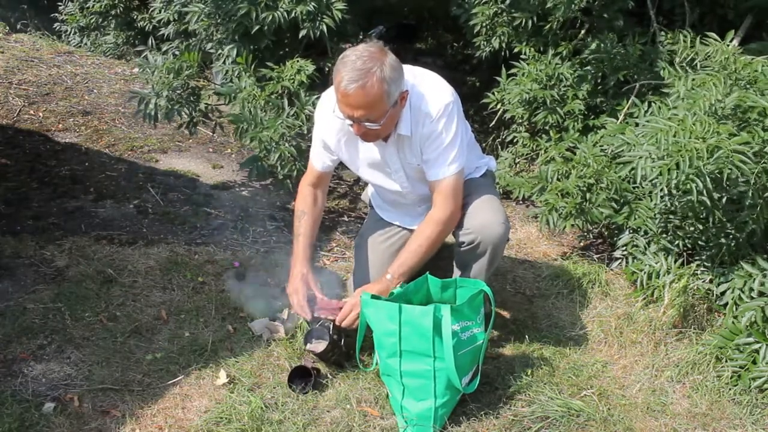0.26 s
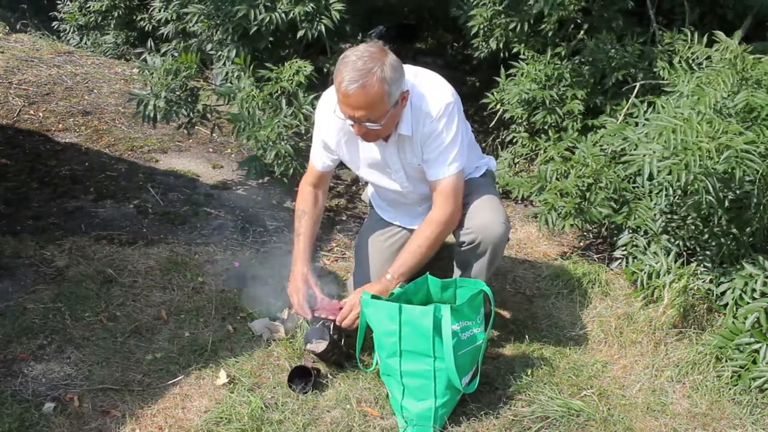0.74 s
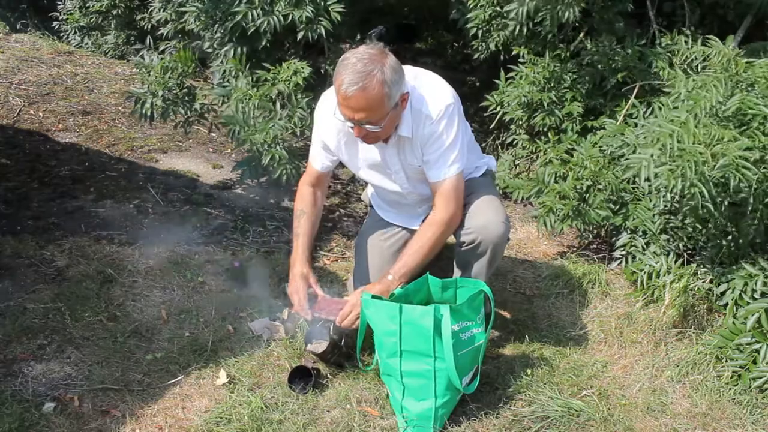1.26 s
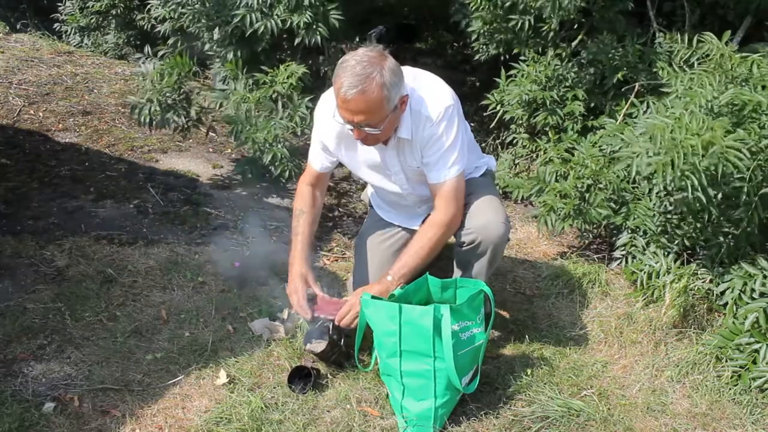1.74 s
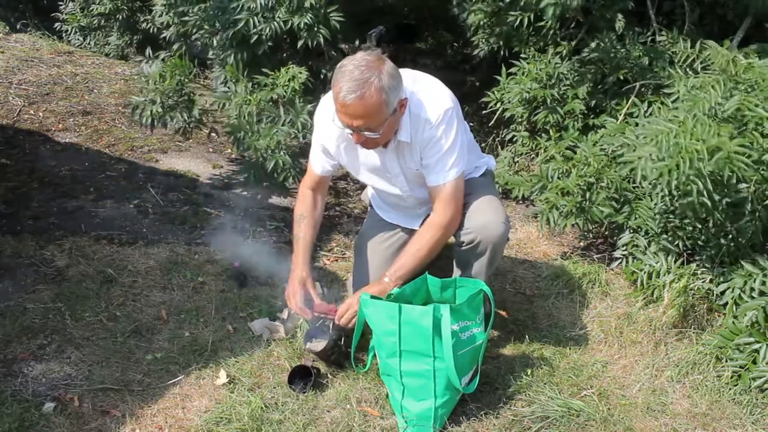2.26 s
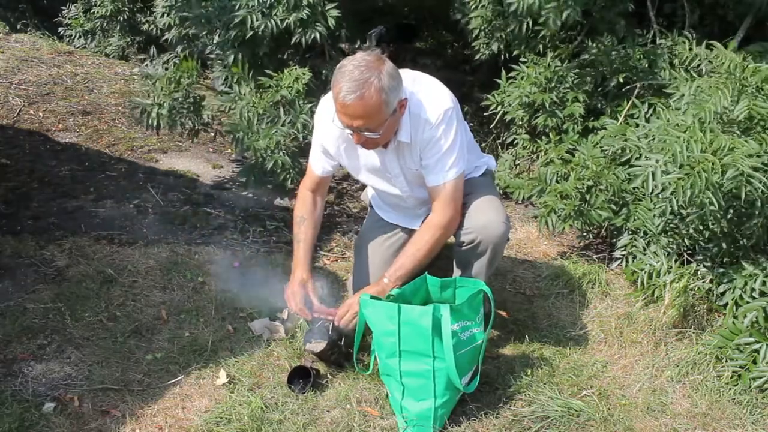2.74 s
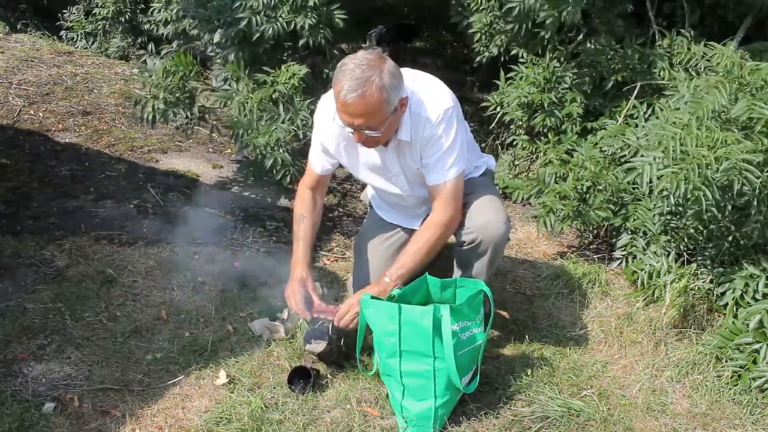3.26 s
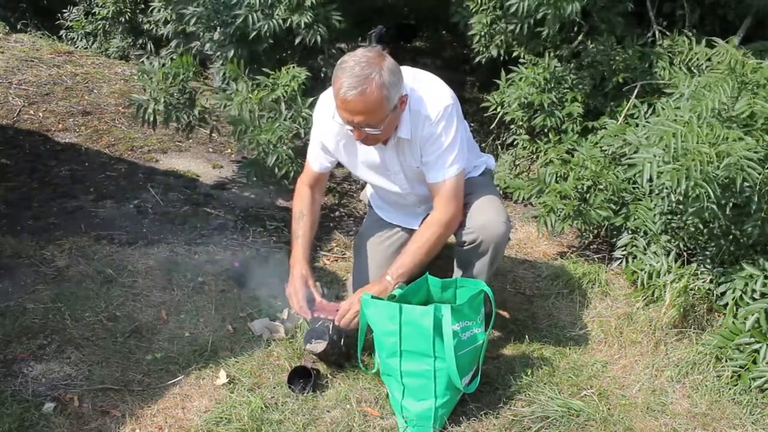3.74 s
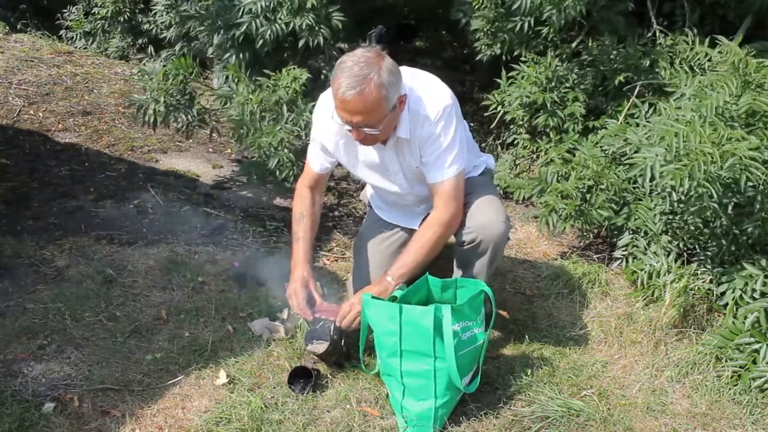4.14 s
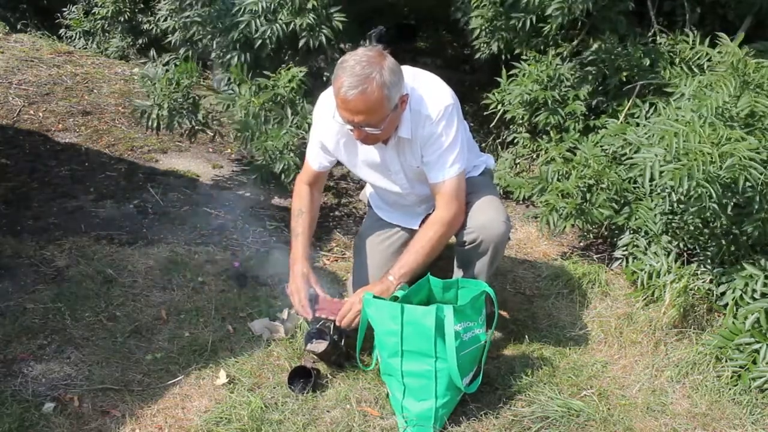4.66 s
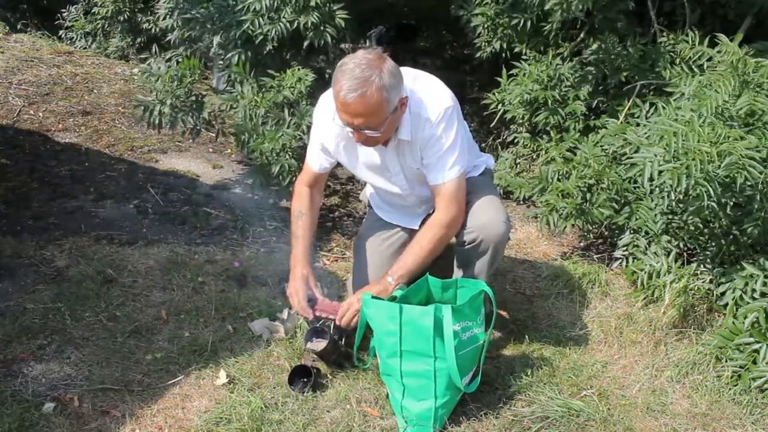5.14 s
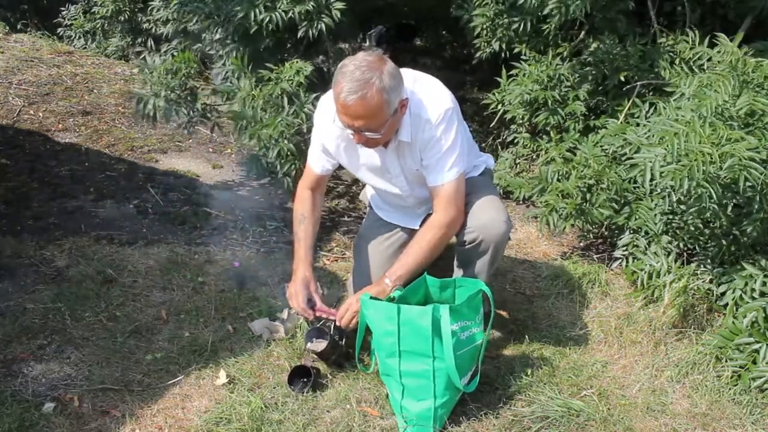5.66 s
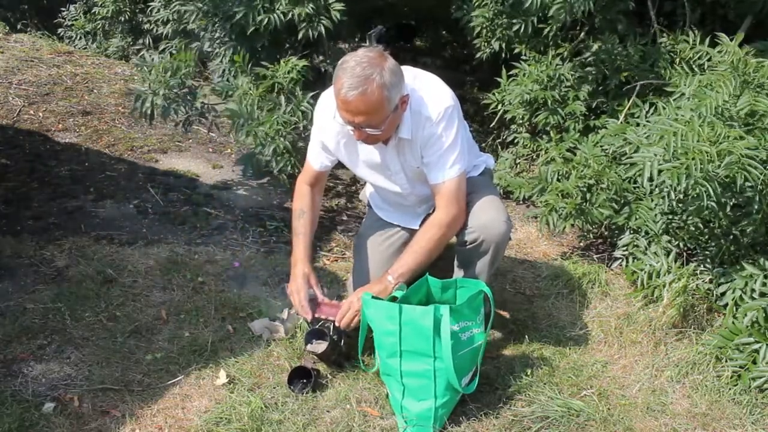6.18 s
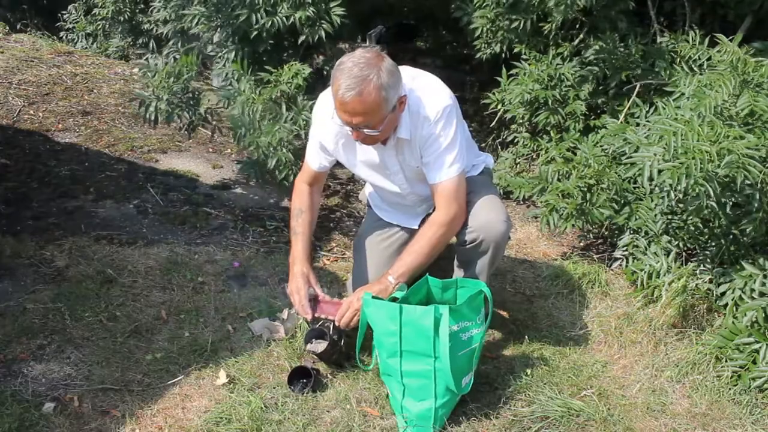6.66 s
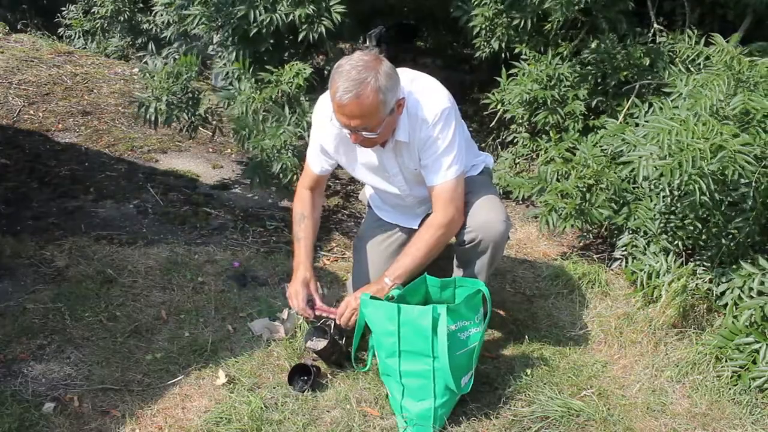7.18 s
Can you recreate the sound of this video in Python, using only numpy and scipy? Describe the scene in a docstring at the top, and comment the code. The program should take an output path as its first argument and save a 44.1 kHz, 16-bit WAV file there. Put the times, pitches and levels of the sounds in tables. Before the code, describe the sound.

Rapid, regular squeezes of a smoker's bellows: hoarse airy whooshes, dry clacks and faint creaks, speeding up slightly amid wind rumble and leaf hiss.

```python
"""A bee smoker is pumped on a lawn, quickening from about two to over two and a half squeezes a second.
Each squeeze is shaped noise: air through smouldering fuel, tin can and nozzle, plus a whistle when brisk.
The bellows suck air back in (noise) and often snap open with a clack; clacks, thuds, creaks and
valve chatter are pushes on decaying modes. Faint echoes follow. Wind rumbles on a single microphone
over a steady hiss of foliage, with thin far notes as of a bird."""
import sys
import numpy as np
from scipy import signal
from scipy.fft import rfft, irfft
from scipy.io import wavfile

SR = 44100
rng = np.random.default_rng(int(sys.argv[2]) if len(sys.argv) > 2 else 0)


def waveform_to_disk(signal):
    """Save audio, clipped to [-1, 1], as 16-bit WAV at the path in sys.argv[1]."""
    frames = np.transpose(np.atleast_2d(signal))
    scaled = np.clip(frames, -1, 1) * 32767
    samples = np.round(scaled).astype(np.int16)
    wavfile.write(sys.argv[1], SR, samples)


N = 327222
TIME_S = np.arange(N) / SR

# All table levels are relative; each source adds its own level.
# squeezes: (start [s], length [s], effort [dB])
SQUEEZES = [(-.026, 0.2, -1.5), (0.461, .2, -1.5), (0.928, .18, -1), (1.378, .19, -2.5), (1.821, 0.18, .5),
            (2.258, .17, 1), (2.677, .17, -1.5), (3.109, 0.17, -0.5), (3.537, .18, 0.5), (3.956, 0.17, .5),
            (4.376, .16, 1), (4.794, .15, 2), (5.18, .16, 0), (5.581, .16, 0), (5.979, .15, 0),
            (6.359, 0.16, 1.5), (6.755, .16, 0), (7.127, .15, 0.5)]
# fuel roar colour: (frequency [Hz], density [dB])
ROAR_COLOUR = [(40, -9), (130, 3.5), (280, 1), (450, 1), (800, -2.5), (1300, -2), (1700, -5.5),
               (2200, -5.5), (3000, -35), (6000, -36)]
# nozzle rush colour: (frequency [Hz], density [dB])
RUSH_COLOUR = [(1200, -16), (2100, -4), (2500, 1.5), (2800, 2.5), (3600, -2.5), (4050, -2), (4300, -8.5),
               (6000, -13.5), (15000, -26)]
# jet hiss colour: (frequency [Hz], density [dB])
HISS_COLOUR = [(2000, -15), (4000, 1), (6000, -1), (7500, 1.5), (9800, 3), (10500, 0), (12000, 0),
               (13400, -5.5), (14300, -7), (15700, -12)]
# can and nozzle resonances: (centre [Hz], width [Hz], lift [dB])
CAN_RESONANCES = [(302, 270, -0.5), (467, 31, 5), (577, 62, 7.5), (725, 98, -9), (1197, 160, 3.5),
                  (1440, 186, 4.5), (2977, 190, 6.5), (3235, 150, 6.5), (3490, 170, 7.5), (3767, 140, 7.5)]
# nozzle whistle partials: (pitch [Hz], waver [Hz], level [dB])
WHISTLE_TONES = [(2520, 46.6, 7), (5066, 67, 2)]
# intake colour: (frequency [Hz], density [dB])
INTAKE_COLOUR = [(200, -17), (700, -9), (1500, 6.5), (2400, 2.5), (3200, 7.5), (4200, 0.5), (5500, 0.5),
                 (7000, -1), (8800, -1), (11800, -1.5), (13200, -7), (14300, -7), (15700, -16)]
# intake port resonances: (centre [Hz], width [Hz], lift [dB])
PORT_RESONANCES = [(1650, 500, -11.5), (3170, 270, -1.5), (3620, 410, -9.5), (6700, 400, -4),
                   (8610, 360, 5.5), (9600, 420, 4.5), (11750, 460, 2.5), (13700, 500, -4), (14350, 550, 4)]
# bellows snapping open: (time [s], strength [dB], extra crack [dB])
SNAPS = [(0.4022, -2, 2.5), (0.8806, -1, -7), (1.3355, -0.5, -7), (1.7836, -4, -6), (2.2023, 2, 2.5),
         (2.6218, 0, 4.5), (3.0106, 2.5, -2), (3.4621, -1, 2), (3.891, 3, 3), (5.1196, 1, 8),
         (5.489, 0, -12), (5.8875, -0.5, -8), (6.266, 0.5, -2.5), (6.6608, -1, -1), (7.0474, -.5, 2),
         (7.4165, -1.5, -12)]
# centres of thump, knock and crack: (frequency [Hz])
CLACK_PART_HZ = [407, 870, 2800]
# modes of the bellows and the can they carry: (frequency [Hz], level [dB], t60 [s])
BELLOWS_MODES = [(172, -17, 0.02), (342, -15, 0.018), (643, -15.5, 0.016), (830, -13, 0.013),
                 (1064, -13.5, 0.0066), (1490, -20.5, 0.015), (1940, -9, 0.0041), (2530, -19.5, 0.0052),
                 (2800, -8, 0.005), (3280, -6.5, 0.0063)]
# heavier buckling of the wall: (time [s], level [dB])
BUCKLES = [(.541, -5), (1.009, -8.5), (1.467, -6), (2.318, -4.5), (3.618, -7), (4.601, -20)]
# further single creaks, faint to loud: (time [s], level [dB], brightness [dB/octave])
CREAKS = [(.9585, -16.5, -12), (2.224, -10.5, -5.5), (2.608, -14, -1), (2.715, -8.5, 2), (3.86, -14.5, 5),
          (3.9705, -19, 2), (4.602, -24, -4), (4.712, -21.5, -4), (5.102, -14.5, 5), (5.587, -16, 0),
          (5.611, -9, -2), (6.334, -20, 3), (7.125, -13.5, 8)]
# ring of a slipping crease: (frequency [Hz], level [dB], t60 [s])
CREASE_RING = [(580, -6.5, 0.013), (920, -1, 0.0079), (1200, -8, 0.013), (1680, -5.5, 0.0082),
               (3030, -8, 0.0036)]
# ring of the valve flap: (frequency [Hz], level [dB], t60 [s])
FLAP_RING = [(250, -5.5, 0.012), (1260, -26, 0.0063), (2500, -2, 0.007), (2940, -5.5, 0.0047),
             (3770, -21, 0.0042)]
# echoes from the ground and the bushes: (delay [s], level [dB])
ECHO_PATHS = [(.0098, -36), (0.011, -24.5), (0.016, -28.5), (.0222, -30), (.0415, -47)]
# wind rumble colour: (frequency [Hz], density [dB])
WIND_COLOUR = [(5, -52), (15, 1), (28, -2.5), (42, -0.5), (65, 3), (100, -2.5), (150, -7), (220, -21.5),
               (350, -30), (600, -40.5), (2000, -63)]
# wind strength: (time [s], level [dB])
GUST_LEVELS = [(0.0, -28), (0.2, -28), (0.35, -19.5), (0.85, -19), (1.0, -31.5), (1.35, -22), (2.0, -22.5),
               (2.7, -30), (2.82, -17.5), (3.05, -24), (3.2, -28.5), (3.65, -26), (4.5, -36.5),
               (4.8, -26.5), (5.05, -29), (5.3, -36.5), (6.2, -28), (7.42, -28.5)]
# sudden buffets on the microphone: (time [s], level [dB])
SUDDEN_BUFFETS = [(.26, -14.5), (1.469, -12.5)]
# foliage colour: (frequency [Hz], density [dB])
FOLIAGE_COLOUR = [(200, 10), (450, 2), (800, -3), (1600, -5.5), (2300, -7), (3200, 1.5), (4000, -3.5),
                  (5000, -9.5), (7000, -13), (10000, -16.5), (15700, -23)]
# far gliding notes: (start [s], length [s], first pitch [Hz], last pitch [Hz], level [dB])
BIRD_NOTES = [(.16, .12, 4130, 3850, -40), (.46, .08, 4400, 4330, -42), (.66, .09, 4270, 4330, -43),
              (3.04, .1, 4240, 4130, -45), (4.25, .1, 4460, 4300, -42), (4.74, .08, 4420, 4300, -45)]

LAST_CYCLE_S = 0.38  # last squeeze and its refill
# woody part of the clack, in easy and in brisk pumping
KNOCK_DB, BRISK_KNOCK_DB, BRISK_FROM_S = -10, -1, 5.3
# the wall folds early in each squeeze but the first, with a creak and a soft thud
FOLD_AFTER_S, FOLD_CREAK_DB, FOLD_THUD_DB = .032, -14, -16
# it stirs again just before each clack
UNFOLD_BEFORE_S, UNFOLD_THUD_DB = .048, -25
CUTOFF_HZ = 15600


def from_db(db):
    """Decibels to amplitude gain."""
    return 10 ** (np.asarray(db) / 20)


def rms_one(x):
    """Scale to rms 1."""
    return x / np.sqrt(np.mean(x ** 2) + 1e-20)


def drift(rate_hz):
    """Smooth random wander of rms 1: noise through a two-pole low-pass."""
    pole = np.exp(-2 * np.pi * rate_hz / SR)
    white = rng.standard_normal(N + SR)
    settled = signal.lfilter([1], [1, -2 * pole, pole * pole], white)[SR:]
    return rms_one(settled)


def noise(colour, resonances=()):
    """Noise of rms 1 with a broad colour, lifted or cut at resonances."""
    hz = np.arange(N // 2 + 1) * SR / N + 1e-3
    points_hz, levels_db = np.transpose(colour)
    db = np.interp(np.log(hz), np.log(points_hz), levels_db)
    for centre_hz, width_hz, lift_db in resonances:
        db = db + lift_db / (1 + (2 * (hz - centre_hz) / width_hz) ** 4)
    return rms_one(irfft(rfft(rng.standard_normal(N)) * from_db(db), N))


def ring(push, hz, t60_s):
    """A pushed mode swings and decays by 60 dB in t60; a unit impulse peaks near 1."""
    pole = from_db(-60 / (t60_s * SR))
    step = 2 * np.pi * hz / SR
    return signal.lfilter([.5, 0, -.5], [1, -2 * pole * np.cos(step), pole * pole], push + 1e-18)


def pushes(times_s, sizes, width_s):
    """Short bell-shaped pushes, each of the given area."""
    out = np.zeros(N)
    out[np.clip(np.round(times_s * SR).astype(int), 0, N - 1)] = sizes
    bell = signal.windows.gaussian(441, width_s * SR)
    return np.convolve(out, bell / bell.sum(), "same")


def strokes(starts_s, lengths_s, levels_db, attack, release, rise_power, fall_power,
            surge_db=0, surge_span=0.086):
    """Gain of repeated strokes: swell, surge, fade; attack, release and span are shares of a stroke."""
    out = np.zeros(N)
    for start, length, db in zip(starts_s, lengths_s, levels_db):
        on = (TIME_S > start) & (TIME_S < start + length)
        share = (TIME_S[on] - start) / length
        surge = surge_db * np.exp(-.5 * ((share - attack) / surge_span) ** 2)
        rise = np.minimum(share / attack, 1) ** rise_power
        fall = np.minimum((1 - share) / release, 1) ** fall_power
        out[on] += from_db(db + surge) * rise * fall
    return out


def cycles_s():
    """Time from each squeeze to the next."""
    return np.append(np.diff(np.array(SQUEEZES)[:, 0]), LAST_CYCLE_S)


def puffs(roar_db=-25.0, rush_db=-27.0, hiss_db=-30.0, flutter_db=2.0, flutter_hz=90):
    """Air roars through the fuel and rushes in the nozzle, both fluttering; the jet hiss swells latest."""
    start, length, effort = np.transpose(SQUEEZES)
    fuel_gain = strokes(start, length, effort + roar_db, attack=0.37, release=0.44,
                        rise_power=0.89, fall_power=0.98, surge_db=4.0)
    nozzle_gain = strokes(start, length, effort + rush_db, attack=0.38, release=0.35,
                          rise_power=1.2, fall_power=1.2, surge_db=5.0)
    jet_gain = strokes(start, length, effort + hiss_db, attack=0.42, release=.35,
                       rise_power=2.2, fall_power=1.83, surge_db=1.6)
    fuel = fuel_gain * noise(ROAR_COLOUR, CAN_RESONANCES)
    nozzle = nozzle_gain * noise(RUSH_COLOUR, CAN_RESONANCES)
    jet = jet_gain * noise(HISS_COLOUR)
    return jet + sum(air * from_db(flutter_db * drift(flutter_hz)) for air in (fuel, nozzle))


def whistle(level_db=-28.5, brisk_cycle_s=0.396, loss_db_per_s=480, peak_share=0.37,
            span_share=0.025, sag_per_s=0.581):
    """At each peak the jet briefly locks into a wavering, sagging tone and octave; weak if pumped slowly."""
    out = np.zeros(N)
    wavers = [drift(83) for _ in WHISTLE_TONES]
    for (start, length, _), cycle in zip(SQUEEZES, cycles_s()):
        on = (TIME_S > start) & (TIME_S < start + length)
        age = TIME_S[on] - start - peak_share * length  # from the peak
        db = level_db - loss_db_per_s * max(cycle - brisk_cycle_s, 0)
        swell = from_db(db) * np.exp(-.5 * (age / (span_share * length)) ** 2)
        for (hz, waver_hz, tone_db), waver in zip(WHISTLE_TONES, wavers):
            pitch_hz = hz * (1 - sag_per_s * age) + waver_hz * waver[on]
            tone = np.sqrt(2) * np.sin(2 * np.pi * np.cumsum(pitch_hz) / SR)
            out[on] += from_db(tone_db) * swell * tone
    return out


def intake(level_db=-36.0, overlap_s=0.014, usual_s=0.22, speed_db=8):
    """Between squeezes the spring opens the bellows and sucks air in, louder when quick."""
    start, length, _ = np.transpose(SQUEEZES)
    pause = cycles_s() - length + overlap_s
    db = level_db + speed_db * np.log10(usual_s / pause)
    gain = strokes(start + length - overlap_s, pause, db, attack=0.37, release=0.31,
                   rise_power=2.5, fall_power=1.9)
    return gain * noise(INTAKE_COLOUR, PORT_RESONANCES)


def clacks(level_db=9.0, contact_s=.00011, scatter_db=2.1, rebound_s=0.00339, rebound_db=-15,
           timing_spread_s=0.00007, slap_db=-3.5, slap_hz=950, slap_t60_s=.0022):
    """The wall pulls taut with a dry slap, not everywhere at once, and rebounds; the bellows ring."""
    time, strength, crack = np.transpose(SNAPS)
    knock = np.where(time > BRISK_FROM_S, BRISK_KNOCK_DB, KNOCK_DB)
    parts_db = np.transpose([strength, strength + knock, strength + crack])
    chance = rng.standard_normal((len(time), len(BELLOWS_MODES), 2))
    slap = pushes(time, from_db(slap_db + strength + knock), contact_s)
    out = ring(slap, slap_hz, slap_t60_s)
    for (hz, mode_db, t60_s), luck, shift in zip(BELLOWS_MODES, *chance.T):
        db = np.array([np.interp(np.log(hz), np.log(CLACK_PART_HZ), row) for row in parts_db])
        size = from_db(level_db + db + mode_db + scatter_db * luck)
        hit = time + timing_spread_s * shift
        all_times = np.append(hit, hit + rebound_s)
        all_sizes = np.append(size, size * from_db(rebound_db))
        out += ring(pushes(all_times, all_sizes, contact_s), hz, t60_s)
    return out


def thuds(level_db=19.0, contact_s=0.00046, delay_s=0.00228):
    """Folding, unfolding and buckling push the bellows slowly and wake mainly their low modes."""
    folds = [(start + FOLD_AFTER_S - delay_s, FOLD_THUD_DB + effort)
             for start, _, effort in SQUEEZES[1:]]
    unfolds = [(time - UNFOLD_BEFORE_S, UNFOLD_THUD_DB) for time, _, _ in SNAPS]
    time, db = np.transpose(BUCKLES + folds + unfolds)
    push = pushes(time + delay_s, from_db(db + level_db), contact_s)
    return sum(from_db(mode_db) * ring(push, hz, t60_s) for hz, mode_db, t60_s in BELLOWS_MODES)


def creases(level_db=-3.5, slips_per_s=700, rate_spread=.18, fall_s=0.0037, jitter=0.13,
            contact_s=.00008, pivot_hz=1100, count=10):
    """A crease lets go in a quick, fading run of slips, each ringing it: a tiny creak."""
    folds = [(start + FOLD_AFTER_S, FOLD_CREAK_DB + effort, 0) for start, _, effort in SQUEEZES[1:]]
    time, db, bright = np.transpose(CREAKS + folds)[:, :, None]
    chance = rng.standard_normal((len(time), count + 1))
    rate_per_s = slips_per_s * np.exp(rate_spread * chance[:, :1])
    age = (np.cumsum(1 + jitter * chance[:, 1:], axis=1) - .5) / rate_per_s
    size = from_db(db + level_db) * np.exp(-(age / fall_s) ** 2 / 2)
    out = np.zeros(N)
    for hz, mode_db, t60_s in CREASE_RING:
        mode_gain = from_db(mode_db + bright * np.log2(hz / pivot_hz))
        push = pushes((time + age).ravel(), (size * mode_gain).ravel(), contact_s)
        out += ring(push, hz, t60_s)
    return out


def flaps(level_db=-25.0, scatter_db=3, before_end_s=0.033, bounce_s=0.0017, contact_s=.00005, count=4):
    """As each squeeze ends the valve flap drops and chatters on its seat."""
    start, length, effort = np.transpose(SQUEEZES)
    gaps = bounce_s * rng.uniform(0, 1.8, (len(start), count))
    times = (start + length - before_end_s)[:, None] + np.cumsum(gaps, axis=1)
    db = level_db + effort + scatter_db * rng.standard_normal(len(start))
    push = pushes(times.ravel(), np.repeat(from_db(db), count), contact_s)
    return sum(from_db(mode_db) * ring(push, hz, t60_s) for hz, mode_db, t60_s in FLAP_RING)


def echoes(x, dull_hz=3000):
    """Ground and bushes send back a few faint, low-passed copies."""
    dull = signal.sosfilt(signal.butter(1, dull_hz, fs=SR, output="sos"), x)
    return sum(from_db(db) * np.interp(TIME_S - delay_s, TIME_S, dull, left=0)
               for delay_s, db in ECHO_PATHS)


def wind(level_db=-0.5, wander_db=2.5, wander_hz=9, buffet_s=0.016):
    """Gusts and sudden buffets rumble on the microphone as low noise."""
    gust_db = np.interp(TIME_S, *np.transpose(GUST_LEVELS)) + wander_db * drift(wander_hz)
    sudden = sum(from_db(db) * np.exp(-.5 * ((TIME_S - time) / buffet_s) ** 2)
                 for time, db in SUDDEN_BUFFETS)
    return from_db(level_db) * np.hypot(from_db(gust_db), sudden) * noise(WIND_COLOUR)


def foliage(level_db=-37.5):
    """Steady coloured noise: the hiss of leaves."""
    return from_db(level_db) * noise(FOLIAGE_COLOUR)


def bird(level_db=-0.5, waver_hz=75):
    """Thin, wavering sine glides, swelling and fading, as of a far bird."""
    out, waver = np.zeros(N), waver_hz * drift(90)
    for start, length, first_hz, last_hz, db in BIRD_NOTES:
        on = (TIME_S > start) & (TIME_S < start + length)
        share = (TIME_S[on] - start) / length
        pitch_hz = first_hz + (last_hz - first_hz) * share + waver[on]
        tone = np.sin(2 * np.pi * np.cumsum(pitch_hz) / SR)
        out[on] += from_db(db + level_db) * np.sin(np.pi * share) * tone
    return out


def scene():
    """Smoker, its echoes and the garden, alike in both channels."""
    smoker = puffs() + whistle() + intake() + clacks() + thuds() + creases() + flaps()
    garden = wind() + foliage() + bird()
    return np.tile(smoker + echoes(smoker) + garden, (2, 1))


def record(dry):
    """The microphone overloads beyond +-1; a steep low-pass cuts the top."""
    steep = signal.ellip(10, .1, 90, CUTOFF_HZ, fs=SR, output="sos")
    return signal.sosfilt(steep, np.clip(dry, -1, 1))


dry = scene()
out = record(dry)
waveform_to_disk(out)
```